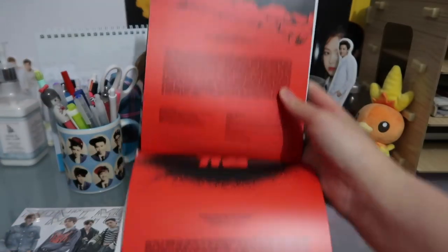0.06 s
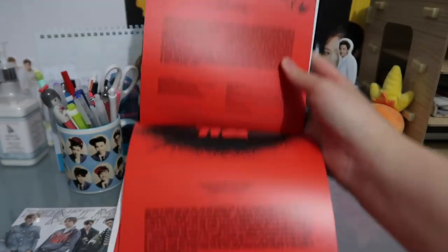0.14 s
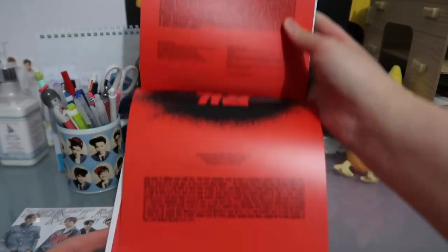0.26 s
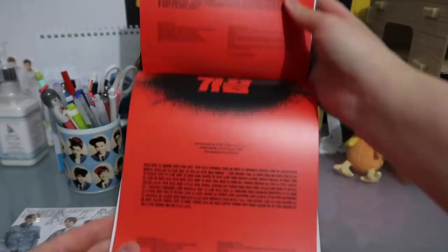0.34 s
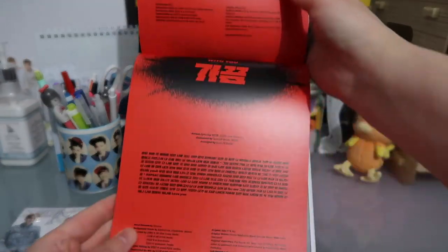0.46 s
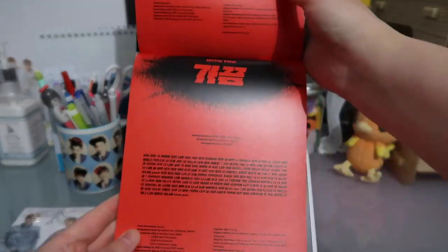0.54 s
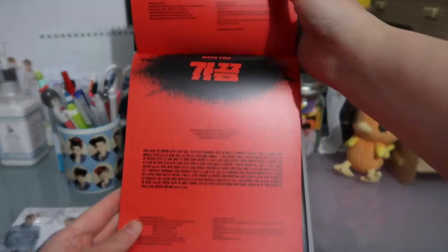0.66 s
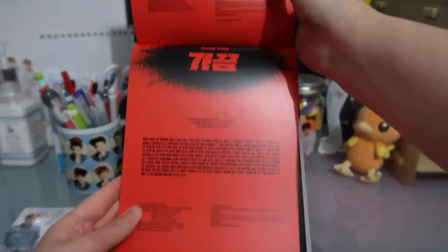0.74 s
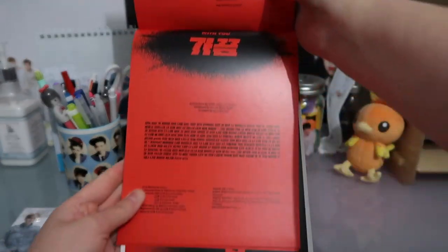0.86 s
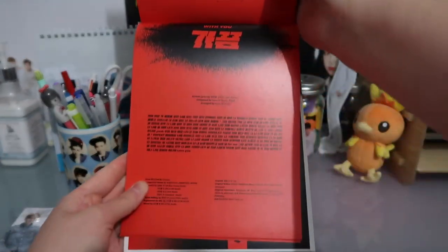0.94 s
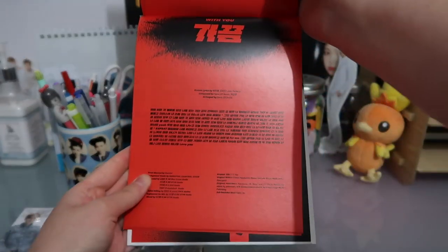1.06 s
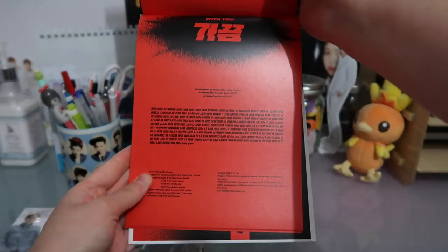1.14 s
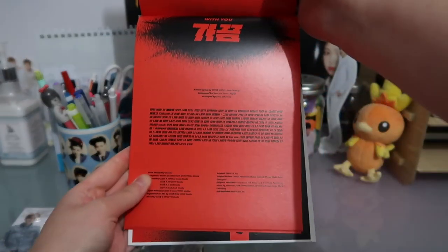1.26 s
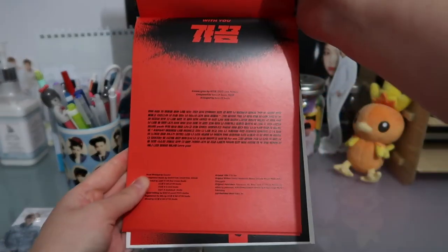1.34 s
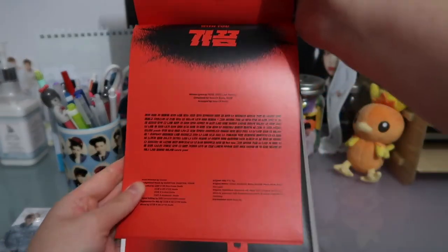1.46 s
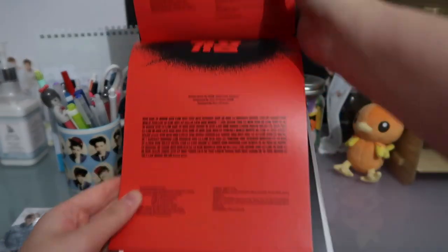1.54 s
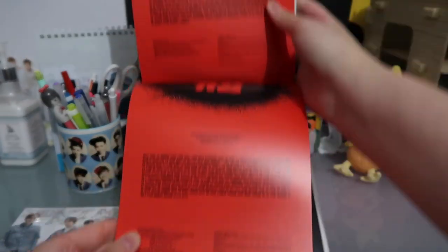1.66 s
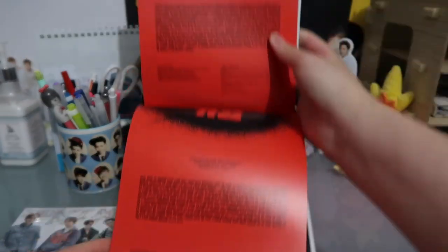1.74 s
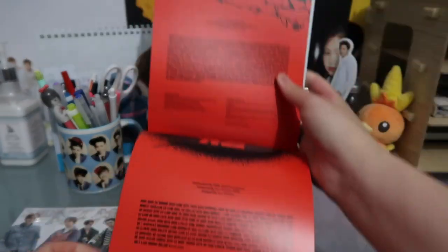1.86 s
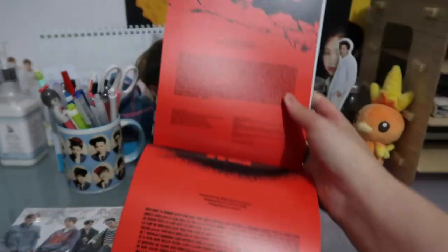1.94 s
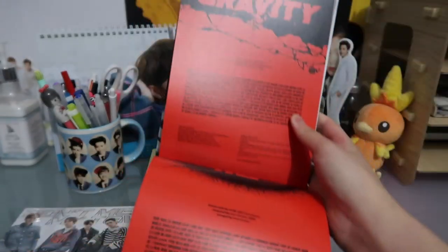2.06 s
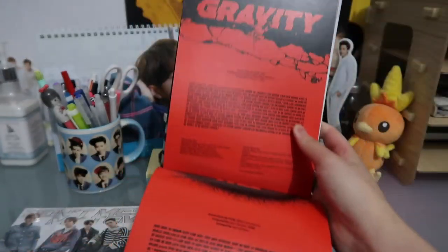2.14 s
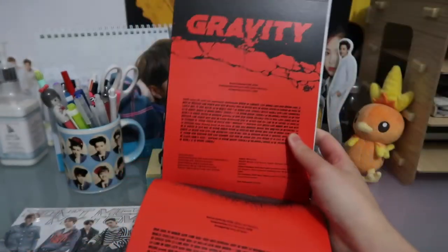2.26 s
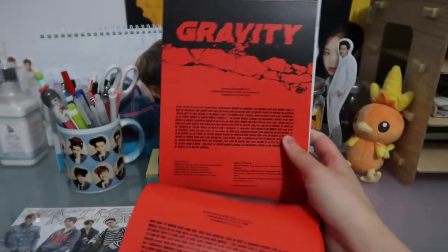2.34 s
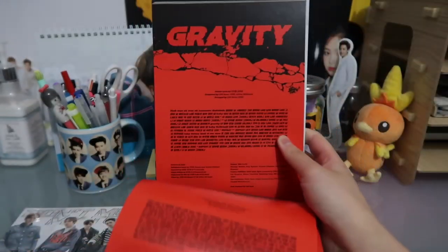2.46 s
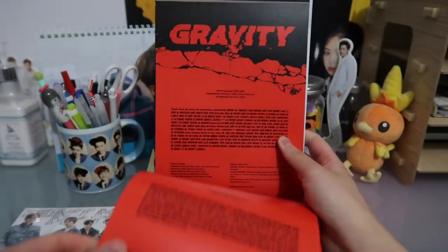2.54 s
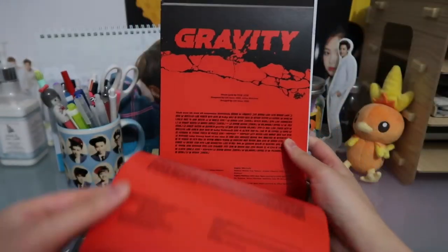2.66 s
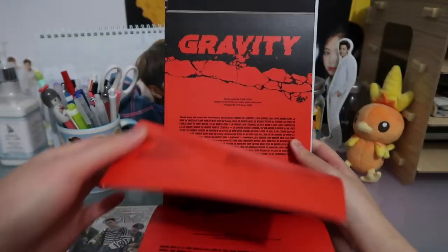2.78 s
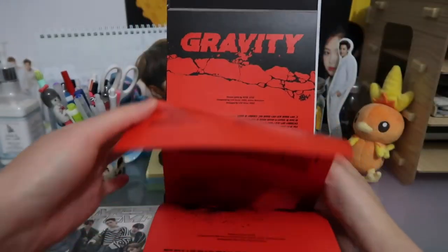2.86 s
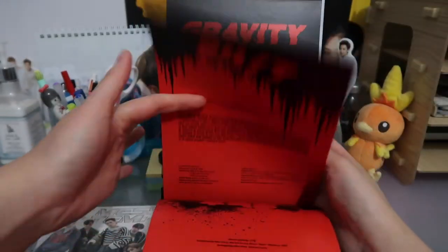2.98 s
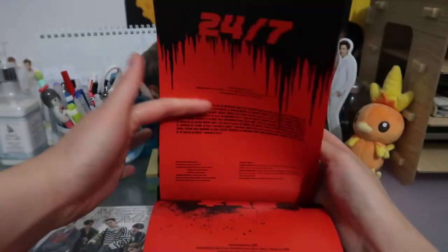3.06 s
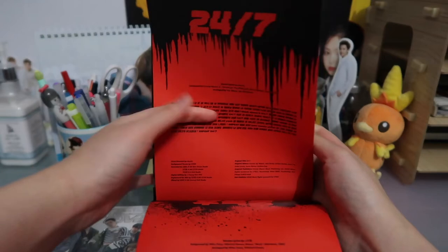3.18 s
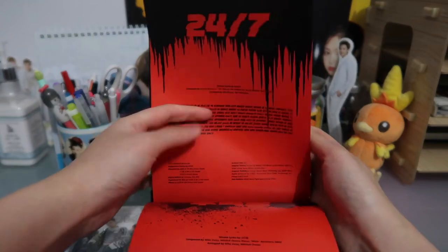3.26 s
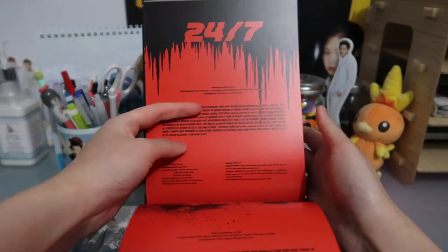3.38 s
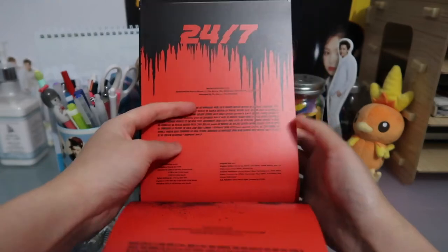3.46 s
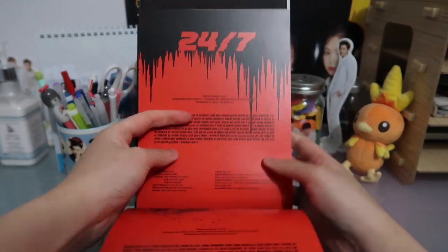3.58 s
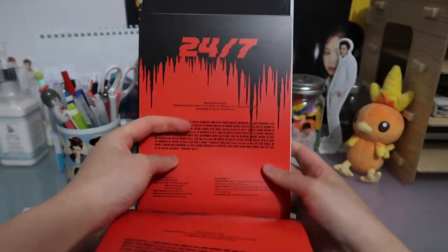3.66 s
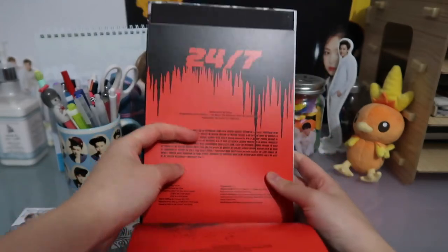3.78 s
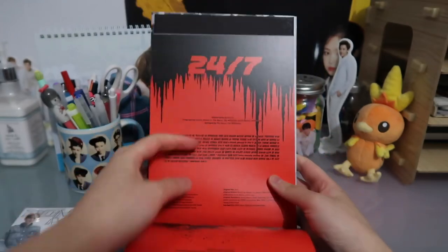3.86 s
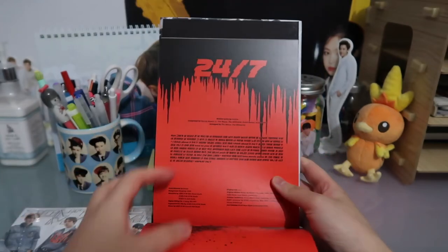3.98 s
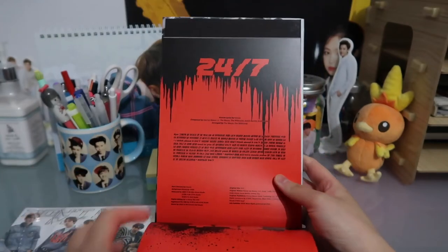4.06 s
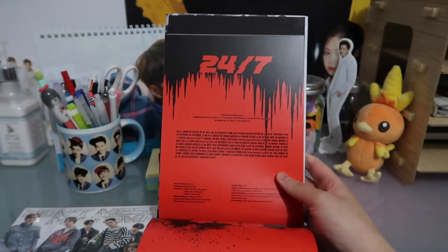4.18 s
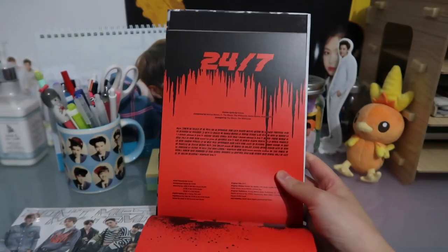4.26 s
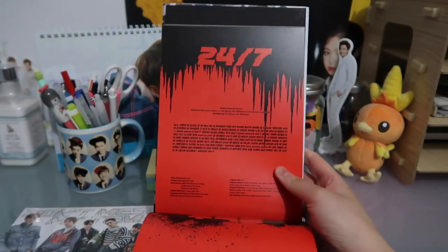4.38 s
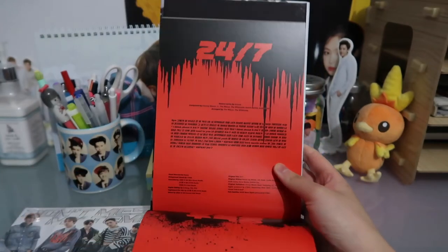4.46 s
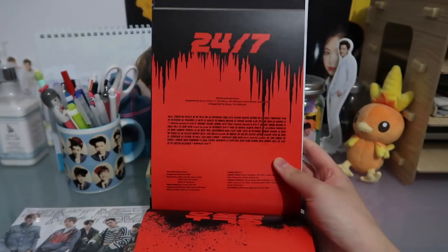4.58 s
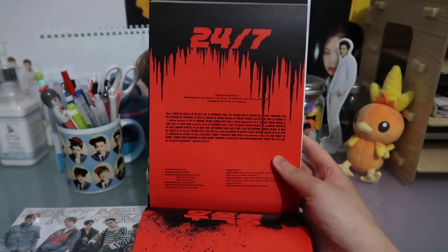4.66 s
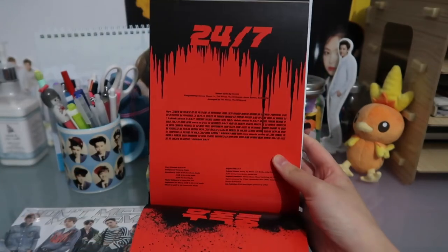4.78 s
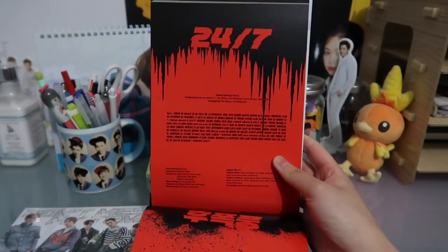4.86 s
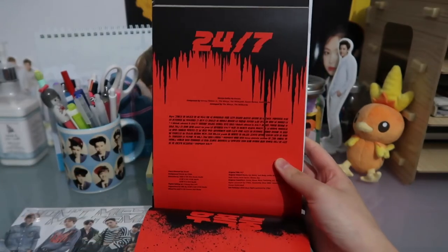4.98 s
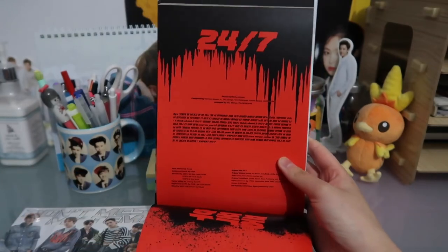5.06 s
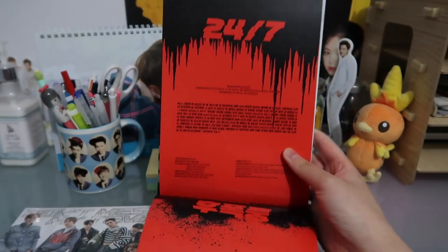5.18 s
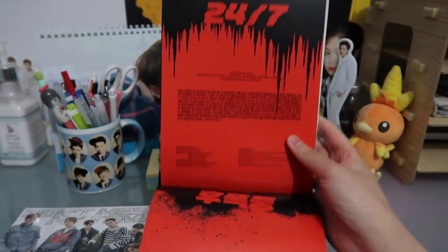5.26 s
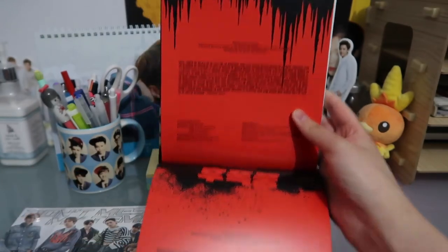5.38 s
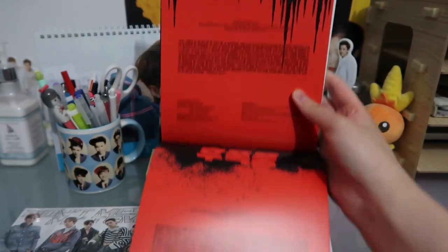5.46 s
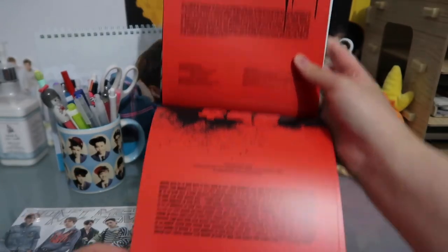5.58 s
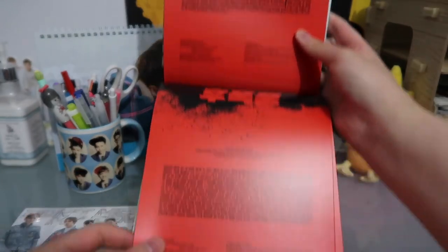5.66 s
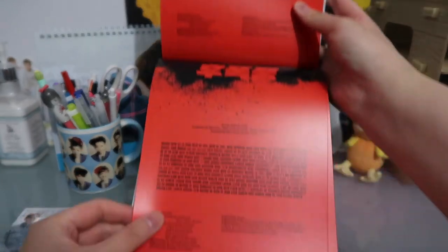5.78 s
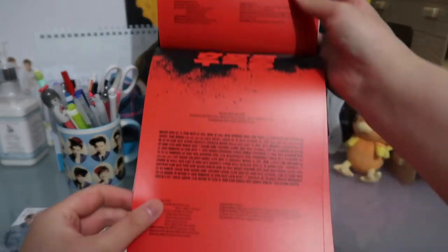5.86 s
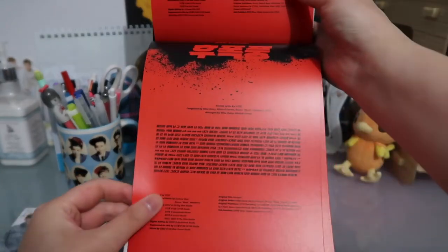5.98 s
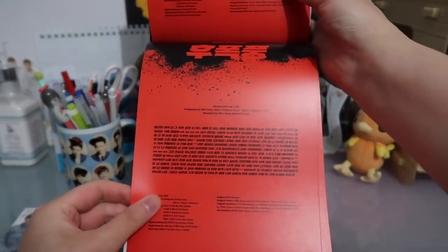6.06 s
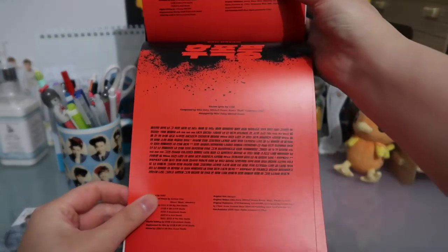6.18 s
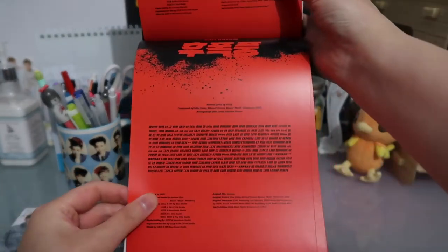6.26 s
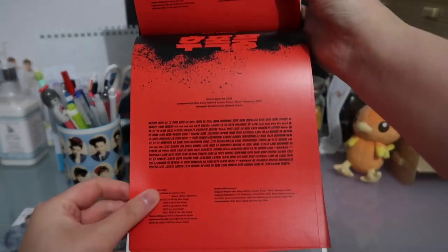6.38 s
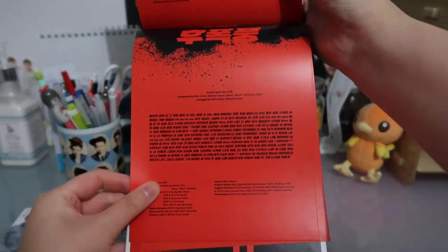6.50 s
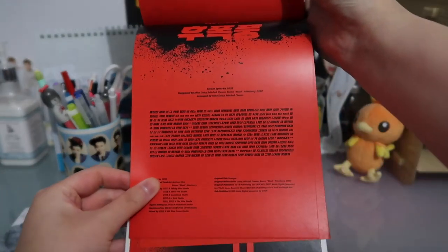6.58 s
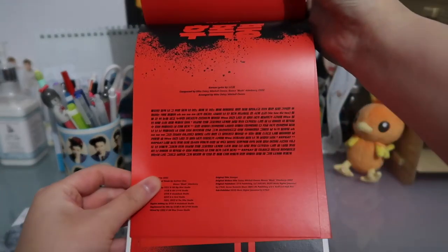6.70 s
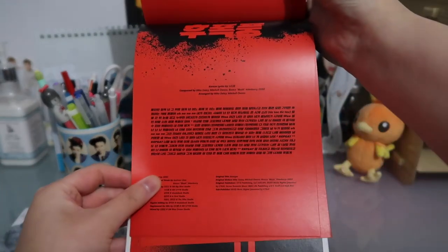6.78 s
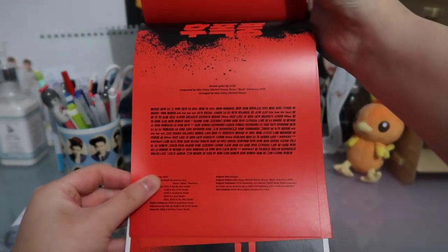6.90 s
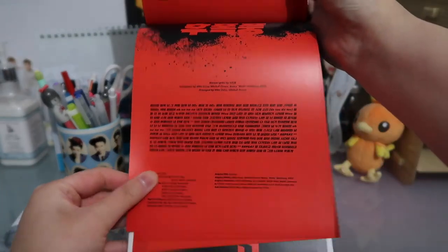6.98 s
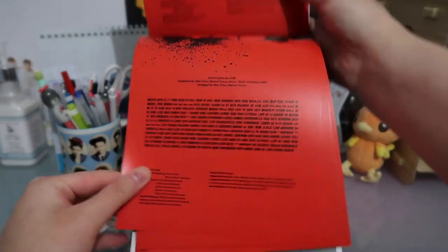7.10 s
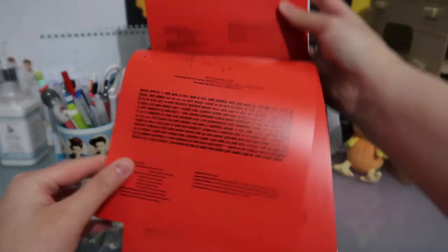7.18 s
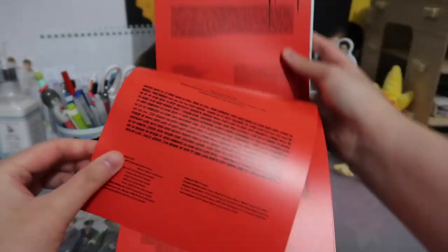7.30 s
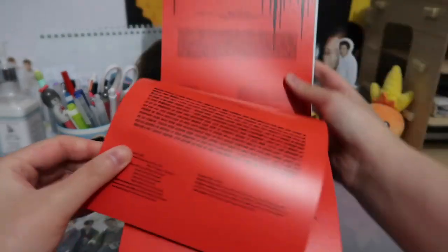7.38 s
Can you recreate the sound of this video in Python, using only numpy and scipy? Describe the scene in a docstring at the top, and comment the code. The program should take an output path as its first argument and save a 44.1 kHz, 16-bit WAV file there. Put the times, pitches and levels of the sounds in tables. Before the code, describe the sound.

Stiff glossy booklet pages are lifted and turned by hand, with crisp flaps, soft taps and brief rustles in a quiet room.

```python
"""Stiff glossy pages of a booklet are slid, lifted and turned by hand in a quiet room.
Friction of sheet on sheet gives a grainy hiss; impacts of corners and spine excite the damped modes
of sheets, covers and fold. A finger squeaks on the gloss, and a falling page pushes air at the
microphone. Underneath lie microphone hiss, a low hum and the pulsed whine of a nearby camera."""
import sys
import numpy as np
from scipy import signal
from scipy.fft import rfft, irfft
from scipy.io import wavfile
from scipy.ndimage import uniform_filter1d

SR = 44100
rng = np.random.default_rng(int(sys.argv[2]) if len(sys.argv) > 2 else 0)


def wrap_up_sound(samples):
    """Save the sound to the file named by the first command line argument, as 16-bit audio."""
    columns = np.atleast_2d(samples).T
    # keep every value between -1 and 1, then stretch to whole-number steps
    tamed = np.clip(columns, -1, 1)
    steps = np.round(tamed * 32767).astype(np.int16)
    wavfile.write(sys.argv[1], SR, steps)


N = 328104

# microphone noise: (frequency [Hz], relative density [dB])
HISS_SPECTRUM = [(88, -19), (150, -1), (440, -2.5), (1320, -9.5), (3600, -14.5), (5600, -20), (11500, -29),
                 (13100, -33), (14000, -58)]
# low background noise: (frequency [Hz], relative density [dB])
RUMBLE_SPECTRUM = [(12, -46), (20, -8), (43, -11), (70, -2), (92, 5.5), (112, 6), (124, -5.5), (300, -2.5),
                   (390, -11.5), (660, -120)]
# partials of the hum: (frequency [Hz], level [dB])
HUM_TONES = [(48.4, -64), (102.3, -69)]
# impacts: (time [s], snap level [dB], boom re snap [dB], thud re snap [dB], tick re snap [dB])
KNOCKS = [(0.014, -19.5, -9, -19, -25.5), (0.081, -26, -12.0, -9, -37), (0.137, -50.5, 16.5, 4, -1),
          (0.162, -21.5, -8, -8.5, -12.5), (0.228, -36.5, -18, -8, -31), (0.249, -43, 5, 4.5, -8),
          (0.316, -30.5, -20.0, -17, -36), (0.652, -44.5, -26, -4, -11), (1.551, -31, -15, -20, -20),
          (1.558, -36, -8, -19, -6.5), (1.601, -35.5, -21, -22, -8), (1.652, -36, -14, -19, -24),
          (1.885, -25, -17, -17, -22.5), (1.972, -29.5, -34, -22, -16), (2.17, -33, -1, -4.5, -11),
          (2.201, -32.5, -12, -9, -31), (2.243, -32.5, -24, -12, -21), (2.353, -48, 4, 8, 2),
          (2.495, -25.5, -2.5, -1, -13), (2.604, -20, -18, -12, -15), (2.625, -39.5, -3, 9.5, -2),
          (2.67, -25, -17, -11, -14), (2.774, -46.5, -5, 4, 2), (2.8, -27.5, -25, -26, -8.5),
          (2.966, -31, -8, -7, -15), (3.025, -39.5, -10, -11, -5), (3.001, -25, -12, -15, -13),
          (3.102, -41, -7, -2, -11), (3.112, -25, -13, -8.5, -17), (3.144, -27, -9.5, -6.5, -24),
          (3.304, -26, -8, -8.0, -35), (3.673, -73.5, -22.0, -23.0, 17.5), (3.76, -12, -11.5, -6, -12.5),
          (3.812, -24.5, -5.5, -0.5, -14), (3.847, -31, -3.5, -5, -16), (3.856, -25, -16, -3.5, -18),
          (4.0, -26.0, -7, -3, -15.5), (4.05, -31.5, -8.5, -10, -14.5), (4.141, -35.5, -2.5, -2, -10.5),
          (4.16, -35.5, -5, 1, -20), (4.277, -41, 2, -4, -10.5), (4.384, -34.5, -7.5, -6, -19),
          (4.455, -33.5, -1.5, -2.5, -15), (4.525, -31.5, -18, -17, -26), (4.687, -37.5, -28, -25, -23),
          (4.762, -22.5, -12, -12, -14), (5.04, -33.5, -17, -13.5, -39), (5.146, -31, -13, -11, -13.5),
          (5.587, -41.5, -6.5, -18, -19), (5.764, -29, -9, -18, -22.5), (7.099, -53, 14.5, 0, -20),
          (7.165, -35, -25, -27, -9.5), (7.193, -39, 1, -14, -13)]
# snap of the stiff sheets: (frequency [Hz], relative level [dB], T60 [s])
SHEET_MODES = [(927, 12, 0.04), (1055, 10, 0.043), (1169, 0, 0.07), (1336, 3.5, 0.023), (1717, 1.5, 0.088),
               (1950, -17, 0.013), (2100, 12, 0.0062), (2770, -7, 0.12)]
# boom of the air in the fold: (frequency [Hz], relative level [dB], T60 [s])
FOLD_MODES = [(245.7, -4, 0.067), (270.3, 5.5, 0.12)]
# thud of the covers: (frequency [Hz], relative level [dB], T60 [s])
COVER_MODES = [(415, -1, 0.044), (515.3, 0.5, 0.077), (563, 3.5, 0.035), (616, -11, 0.093)]
# edge of a sheet landing: (frequency [Hz], relative density [dB])
TICK_SPECTRUM = [(1060, 6), (1800, 2.5), (1980, -2), (3040, -7), (4360, -13), (11200, -57), (14000, -80)]
# low resonance of the bent page: (time [s], frequency [Hz])
BEND_PITCH = [(1.5, 1140), (2.02, 960), (2.06, 1790), (2.24, 1500), (2.32, 1610), (2.451, 1500),
              (2.51, 1020), (2.74, 1310), (3.04, 1300), (3.1, 1000), (3.24, 1530), (3.3, 960), (3.45, 1540),
              (3.7, 1130), (5.7, 1110), (7.24, 1050), (7.3, 1430), (7.36, 1040)]
# strokes of sheet on sheet:
# (start [s], end [s], rub level [dB], sheen re rub [dB], high band re rub [dB], its frequency [Hz])
STROKES = [(0.027, 0.09, -55.5, -2, -7, 6050), (0.22, 0.27, -58, 1, -9, 4760),
           (0.307, 0.379, -60.5, -3.5, -7, 4900), (0.406, 0.509, -55, -2.5, -4, 2980),
           (0.54, 0.608, -64, -10, -12, 3640), (1.196, 1.219, -61, -20, -5, 3300),
           (1.57, 1.642, -53, -10, -6, 3630), (1.648, 1.693, -46.5, -12.5, -22, 3250),
           (1.88, 1.973, -58, -6, -11, 3020), (1.967, 1.985, -45, -5.5, -22, 3780),
           (2.053, 2.16, -54, -3, -25, 4160), (2.161, 2.198, -45, -3.5, -25, 3650),
           (2.238, 2.262, -45.5, -7.5, -4, 3240), (2.277, 2.358, -56, -13, -6, 5740),
           (2.341, 2.407, -51, -6.5, -27, 4100), (2.431, 2.53, -54.5, -6, 0, 2850),
           (2.505, 2.602, -57.5, -1.5, -3, 2720), (2.61, 2.67, -47.5, -12, -10, 2530),
           (2.796, 2.865, -48, -8, -6, 3920), (2.88, 2.972, -43, -9.5, -10, 3680),
           (2.951, 3.031, -41, -10.5, -6, 3560), (3.032, 3.106, -55.5, 0.5, -17, 3170),
           (3.106, 3.197, -51.5, -12.5, 2, 2760), (3.185, 3.252, -53.5, -3.5, -3, 3880),
           (3.31, 3.354, -53.5, -16, 0.5, 2820), (3.366, 3.411, -51, -10, -17, 3500),
           (3.414, 3.438, -48.5, -3, -3, 3600), (4.126, 4.313, -70, 2, -18, 2690),
           (4.521, 4.559, -55, -3, -12, 6610), (5.633, 5.729, -56.5, 0.5, -5, 3500),
           (5.763, 5.772, -44, -9.5, -21, 3430), (7.074, 7.125, -51, 0.5, -5, 6350),
           (7.112, 7.156, -46, -3.5, -1.5, 6540), (7.203, 7.201, -39, -5.5, -3, 5630),
           (7.22, 7.281, -44, -7, -6.5, 3730), (7.268, 7.434, -54.5, -2.5, 2, 2870)]
# midrange of the friction noise: (frequency [Hz], relative density [dB])
RUB_SPECTRUM = [(880, -59), (1500, -7), (2890, -6), (4400, -10), (6000, -42), (7800, -48), (13200, -120)]
# bright sheen of the paper: (frequency [Hz], relative density [dB])
SHEEN_SPECTRUM = [(2940, -15), (5000, -3), (6110, -4), (7650, -8.5), (12000, -16.5), (15300, -34)]
# hollow booklet driven by friction: (frequency [Hz], relative density [dB])
BODY_SPECTRUM = [(88, -12), (150, 0.5), (266, 0.5), (338, 6), (510, -0.5), (868, -4), (978, 2.5), (1280, 2),
                 (2000, -1), (2600, -33), (4400, -120)]
# finger slipping on the gloss: (start [s], duration [s], level [dB], frequency [Hz])
SQUEAKS = [(1.143, 0.13, -59, 1330), (5.719, .022, -51, 3350), (5.751, .024, -53, 3470)]
# air pushed by a page: (time [s], level [dB], decay time [s])
PUFFS = [(1.556, -33, 0.0077), (3.109, -35.5, 0.039)]


def gain_of(db):
    """Amplitude ratio of a level in decibels."""
    return 10 ** (np.asarray(db) / 20)


def unit_rms(x):
    """Normalisation to a mean square of one."""
    return x / np.sqrt(np.mean(x ** 2) + 1e-20)


def add(mix, start_s, sound):
    """Superposition of a sound on the mix."""
    part = mix[round(start_s * SR):][:len(sound)]
    part += sound[:len(part)]


def coloured(x, spectrum):
    """Spectral weighting by (frequency [Hz], level [dB]) points, at unit rms."""
    points_hz, points_db = np.transpose(spectrum)
    hz = np.fft.rfftfreq(x.shape[-1], 1 / SR)
    db = np.interp(np.log(hz + 1), np.log(points_hz + 1), points_db)
    return unit_rms(irfft(rfft(x) * gain_of(db), x.shape[-1]))


def drift(cutoff_hz):
    """Random fluctuation: low-passed noise of unit rms."""
    rolloff = 1 + (np.fft.rfftfreq(N, 1 / SR) / cutoff_hz) ** 4
    return unit_rms(irfft(rfft(rng.standard_normal(N)) / rolloff, N))


def resonate(x, hz, width_hz):
    """Moving resonance by heterodyning: shift the curve hz to zero, smooth, and shift back."""
    carrier = np.exp(2j * np.pi * np.cumsum(hz) / SR)
    pole = np.exp(-np.pi * width_hz / SR)
    return 2 * (carrier * signal.lfilter([1 - pole], [1, -pole], x / carrier)).real


def background():
    """Noise floor: hiss is incoherent between the microphones, rumble and wavering hum are coherent."""
    hiss = gain_of(-55) * coloured(rng.standard_normal((2, N)), HISS_SPECTRUM)
    rumble = gain_of(-61) * coloured(rng.standard_normal(N), RUMBLE_SPECTRUM)
    hum = np.zeros(N)
    for hz, db in HUM_TONES:
        amplitude = gain_of(db + 3.4 * drift(4.4))
        hum += amplitude * np.sin(2 * np.pi * np.cumsum(hz + 1.6 * drift(12.5)) / SR)
    return hiss + rumble + hum


def camera_whine(hz=13012.5, swells_per_s=25):
    """Amplitude modulation: a thin tone of the electronics swells once every picture."""
    t = np.arange(N) / SR
    side_phase = np.array([[1.1], [-1.1]])
    tone = np.sin(2 * np.pi * hz * t + side_phase)
    return gain_of(-70) * tone * np.cos(np.pi * swells_per_s * (t - .004))


def ring(modes, t, rise_s, spread_db=2.5):
    """Free decay of modes, peak 1; each blow lands elsewhere and shifts their pitch and share."""
    hz, db, t60 = np.transpose(modes)[:, :, None]
    share, detune = rng.standard_normal((2, len(modes), 1))
    envelopes = gain_of(db + spread_db * share - 60 * t / t60)
    tones = envelopes * np.sin(2 * np.pi * hz * (1 + 0.022 * detune) * t)
    sound = tones.sum(0) * (1 - np.exp(-t / rise_s))
    return sound / abs(sound).max()


def knock(bend_hz, snap_db, boom_db, thud_db, tick_db):
    """Impact excitation: a rattling contact rings sheets, fold and covers; the edge adds a tick."""
    t = np.arange(8192) / SR
    late = np.maximum(t - 0.0016, 0)  # the blow takes a moment to reach covers and fold
    # sheet modes near the pitch of the bend ring most
    sheets = [(hz, db + 8.5 * np.exp(-(np.log2(hz / bend_hz) / 0.12) ** 2), t60)
              for hz, db, t60 in SHEET_MODES]
    radiation = 0.53 + 0.36 * np.exp(-t / 0.00083)  # the first swings radiate most
    snap = radiation * ring(sheets, t, rise_s=0.00027)
    boom = gain_of(boom_db) * ring(FOLD_MODES, late, rise_s=0.00092)
    thud = gain_of(thud_db) * ring(COVER_MODES, late, rise_s=0.0018)
    response = snap + boom + thud
    # sheets of the stack close up one after another
    rattle = 0.05 * rng.standard_normal(2048) ** 3 * np.exp(-t[:2048] / 0.01)
    blow = np.r_[4.5, rattle[1:]]
    body = signal.fftconvolve(response, blow)[:len(t)]
    body *= np.linalg.norm(response) / np.linalg.norm(body)  # the rattle adds no energy
    noise = rng.standard_normal((2, len(t)))
    edge = coloured(noise[0], TICK_SPECTRUM)
    edge += gain_of(tick_db - 13.5) * coloured(noise[1], SHEEN_SPECTRUM)  # a bare edge ticks brighter
    decay = 1.79 * np.exp(-t / 0.0047) + .5 * np.exp(-t / 0.024)
    tick = edge * decay * (1 - np.exp(-t / 0.00033))
    return gain_of(snap_db) * (body + gain_of(tick_db) * tick)


def knocks():
    """Radiation of the impacts: a source as small as a booklet gives off no deep bass."""
    out = np.zeros(N)
    for start, *levels in KNOCKS:
        bend_hz = np.interp(start, *np.transpose(BEND_PITCH))
        add(out, start, knock(bend_hz, *levels))
    return signal.sosfilt(signal.butter(2, 90, "highpass", fs=SR, output="sos"), out)


def stroke_powers(half_rise_s=0.02, half_fall_s=0.03, creep_s=0.064, creep_db=-9.5):
    """Incoherent strokes add in power: gives rub, sheen, body, high band, and that band's pitch."""
    powers = np.zeros((4, N))
    high_hz = np.full(N, float(STROKES[0][-1]))
    for start, end, db, sheen_db, high_db, hz in STROKES:
        t = np.arange(start - half_rise_s, end + half_fall_s, 1 / SR)
        ramp = np.minimum((t - t[0]) / half_rise_s, (t[-1] - t) / half_fall_s) / 2
        arch = np.sin(np.pi / 2 * np.clip(ramp, 0, 1)) ** 2
        body_db = 1.5 - 0.32 * (db + 54.5) - 0.27 * sheen_db  # light, dull strokes favour the booklet
        for power, layer_db in zip(powers, (0, sheen_db, body_db, high_db)):
            add(power, max(t[0], 0), (gain_of(db + layer_db) * arch) ** 2)
        high_hz[round((start - half_rise_s / 2) * SR):] = hz
    settle = np.exp(-1 / (creep_s * SR))  # the sheets creep on after each stroke
    powers += gain_of(creep_db) ** 2 * signal.lfilter([1 - settle], [1, -settle], powers)
    return *powers, high_hz


def singing_band(slips, hz, wander, width_hz):
    """Forced resonance: slips drive a bent sheet in a narrow band of wandering pitch."""
    pitch = uniform_filter1d(hz, size=200) * (1 + wander * drift(34))
    return unit_rms(resonate(resonate(slips, pitch, width_hz), pitch, width_hz))


def patchy(x, depth_db):
    """Random modulation over time and frequency: parts of the sheet take turns in sounding."""
    spectra = signal.stft(x, nperseg=256)[2]
    patches = uniform_filter1d(rng.standard_normal(spectra.shape[-2:]), size=4, axis=0)
    patches = uniform_filter1d(patches, size=10, axis=1)
    return signal.istft(spectra * gain_of(depth_db * unit_rms(patches)), nperseg=256)[1][..., :N]


def rubbing():
    """Sliding friction: dense clumps of slips drive a hiss, two singing bands and the booklet."""
    rub, sheen, body, high, high_hz = stroke_powers()
    low_hz = np.interp(np.arange(N) / SR, *np.transpose(BEND_PITCH))
    flutter = gain_of(1.5 * np.array([drift(30) for layer in range(4)]) + 2.0 * drift(250))
    slips = flutter * rng.standard_normal((4, N)) * gain_of(1.8 * rng.exponential(1, (4, N)))
    slips[[0, 2]] += 5.7 * rng.standard_normal(N) * (rng.random(N) < 120 / SR)  # creases crack
    high_band = singing_band(slips[3], high_hz, wander=0.012, width_hz=460)
    low_band = singing_band(slips[3], low_hz, wander=0.019, width_hz=290)
    middle = 0.86 * np.sqrt(rub) * coloured(slips[0], RUB_SPECTRUM) + np.sqrt(high) * high_band
    middle += np.sqrt(body) * (0.87 * coloured(slips[2], BODY_SPECTRUM) + gain_of(-5.0) * low_band)
    # short waves leave the wide sheet from many places and reach the two microphones unlike
    side = 0.52 * np.array([[1], [-1]]) * coloured(slips[3], SHEEN_SPECTRUM)
    treble = np.sqrt(sheen) * (coloured(slips[1], SHEEN_SPECTRUM) + side)
    return patchy(middle + treble, depth_db=2.03)


def room(x):
    """Reverberation: sparse reflections of random sign, distinct on each side, treble dying first."""
    taps = np.zeros((2, SR // 4))
    delays = np.arange(100, SR // 4 - 20, 20)
    delays = delays + rng.integers(0, 20, (2, len(delays)))
    np.put_along_axis(taps, delays, rng.choice([-1., 1.], delays.shape), 1)
    hz, t, spectra = signal.stft(taps, SR, nperseg=256)
    t60 = np.interp(hz, [300, 2000, 10000], [.2, .15, .1])
    tail = signal.istft(spectra * gain_of(-60 * t / t60[:, None]), SR, nperseg=256)[1]
    tail = signal.sosfilt(signal.butter(1, 1500, "highpass", fs=SR, output="sos"), tail)
    return signal.fftconvolve(x[None], tail / np.linalg.norm(tail[0]), axes=1)[:, :N]


def squeaks():
    """Narrow-band resonance: skin slipping on the coating whistles briefly."""
    out = np.zeros(N)
    for start, duration, db, hz in SQUEAKS:
        progress = np.arange(0, 1, 1 / (duration * SR))
        whistle = resonate(rng.standard_normal(len(progress)), np.full(len(progress), hz), width_hz=110)
        add(out, start, gain_of(db) * np.sin(np.pi * progress) * unit_rms(whistle))
    return out


def puffs():
    """Air displacement: a sweeping page makes low, lumpy pressure at the microphone."""
    out = np.zeros(N)
    low_band = signal.butter(2, [45, 150], "bandpass", fs=SR, output="sos")
    for start, db, decay_s in PUFFS:
        age = np.arange(round(6 * decay_s * SR)) / (decay_s * SR)  # in decay times
        air = unit_rms(signal.sosfilt(low_band, rng.standard_normal(len(age))))
        add(out, start, gain_of(db) * air * np.minimum(12 * age, 1) * np.exp(-age))
    return out


def scene():
    """Superposition of the paper, its reverberation, the puffs and the noise floor with its whine."""
    paper = knocks() + rubbing() + squeaks()
    return paper + gain_of(-14.0) * room(paper.mean(0)) + puffs() + background() + camera_whine()


def record(dry):
    """Band limiting by a linear-phase low-pass at 15.5 kHz."""
    lowpass = signal.firwin(511, 15500, window=("kaiser", 9), fs=SR)
    return signal.oaconvolve(dry, lowpass[None], "same")


dry = scene()
out = record(dry)
wrap_up_sound(out)
```